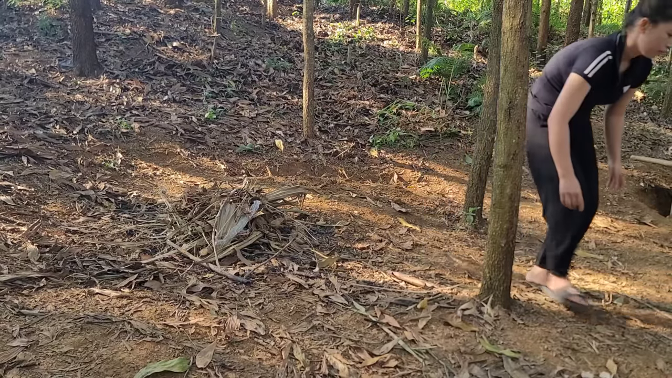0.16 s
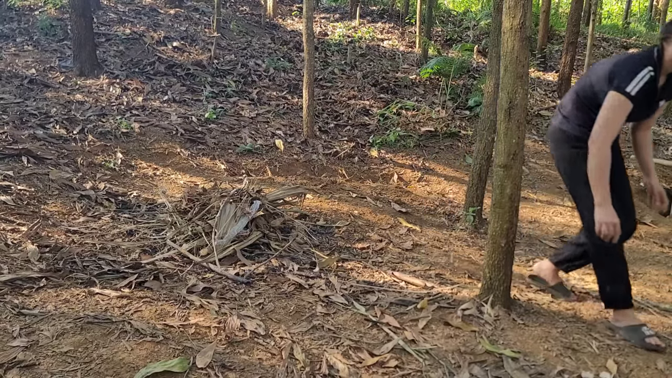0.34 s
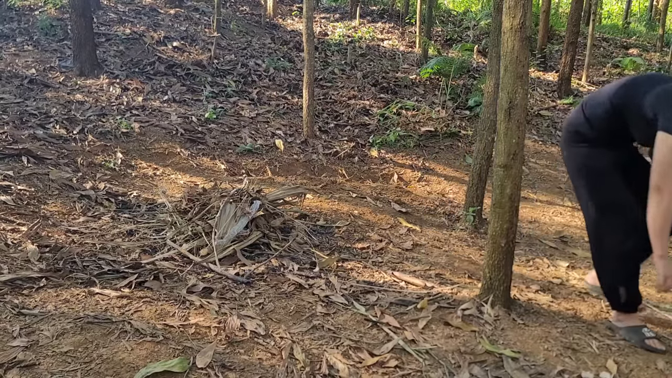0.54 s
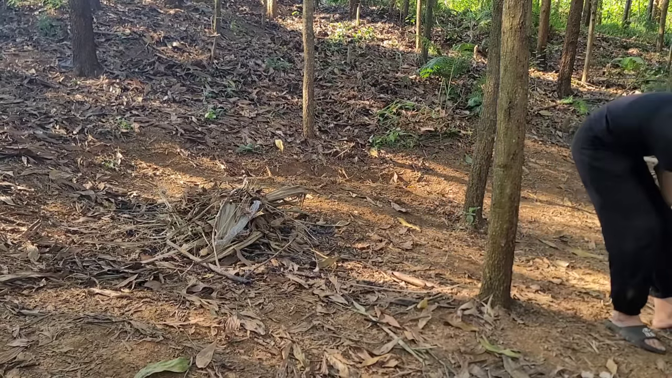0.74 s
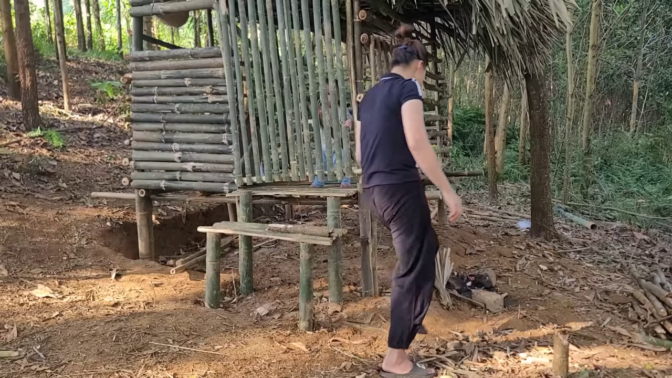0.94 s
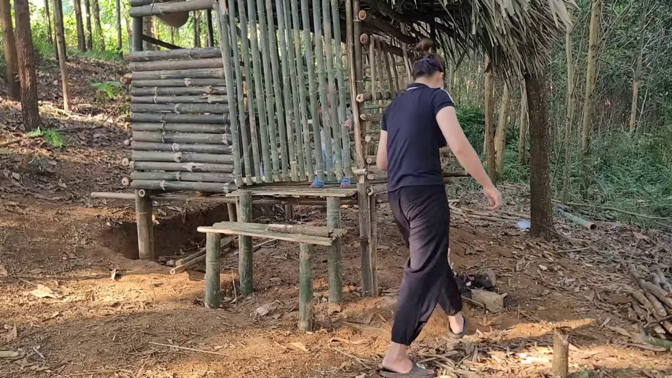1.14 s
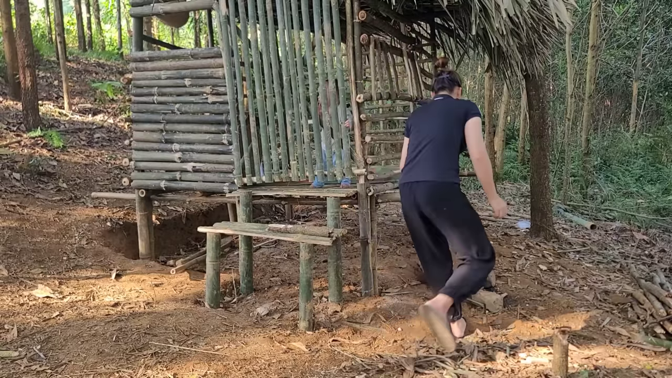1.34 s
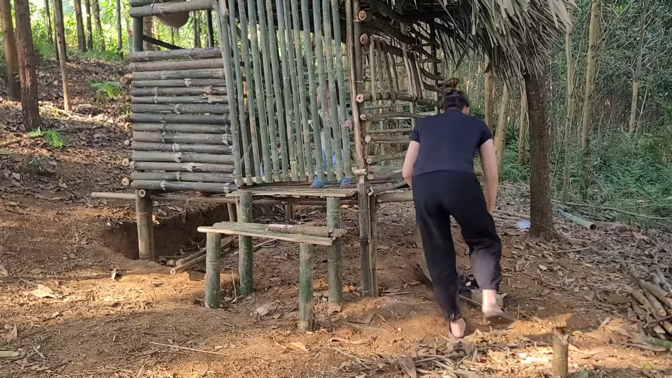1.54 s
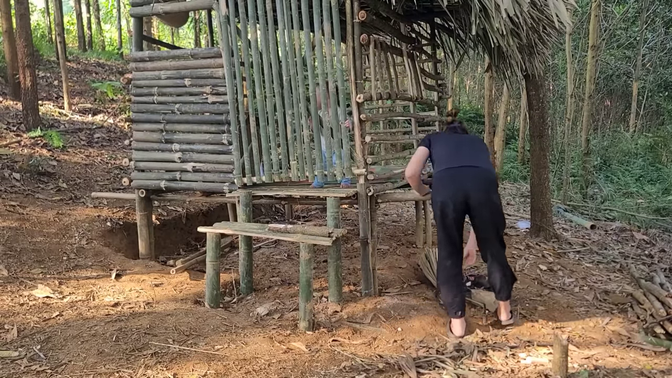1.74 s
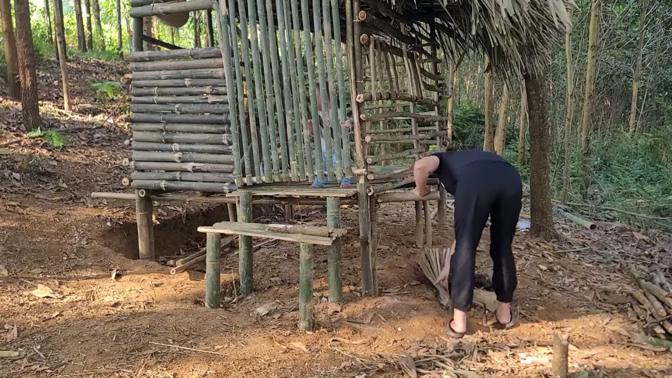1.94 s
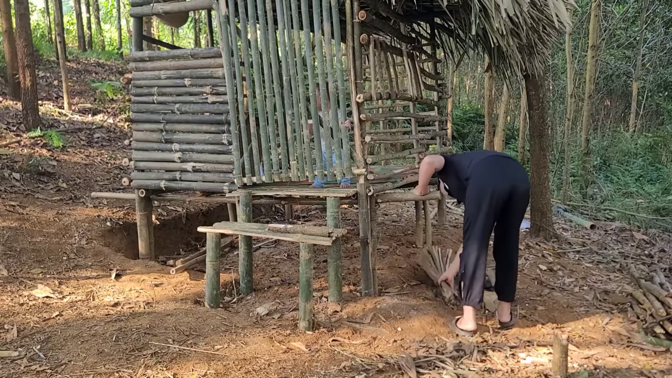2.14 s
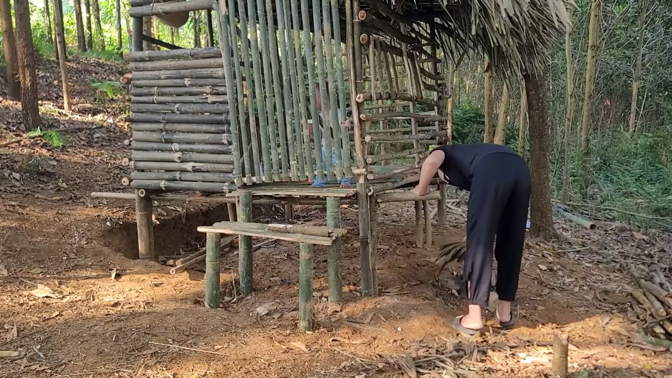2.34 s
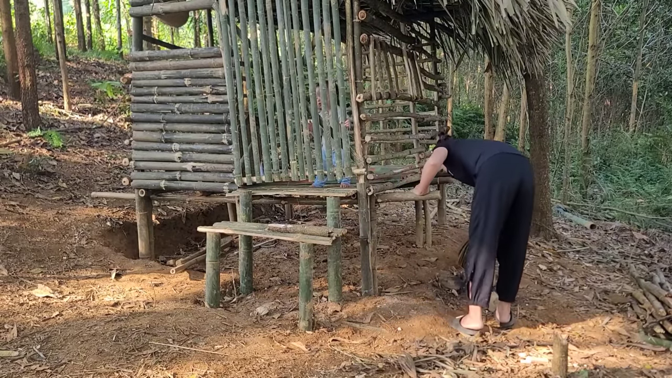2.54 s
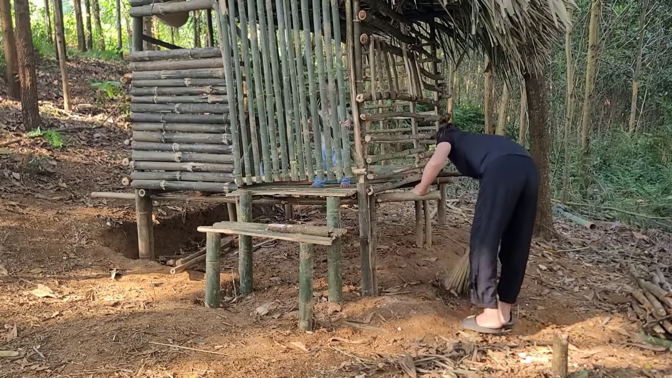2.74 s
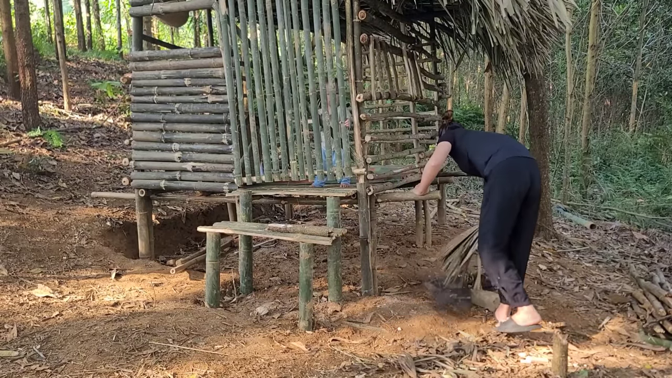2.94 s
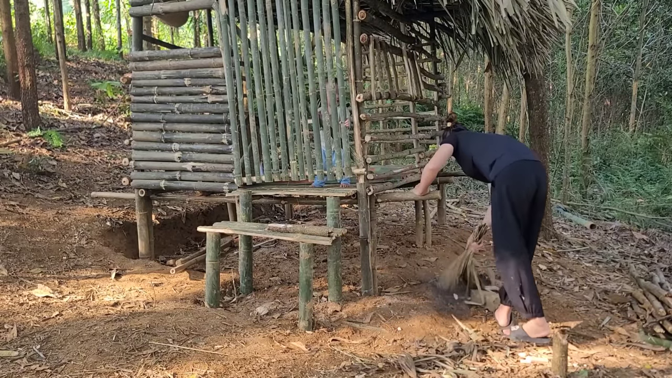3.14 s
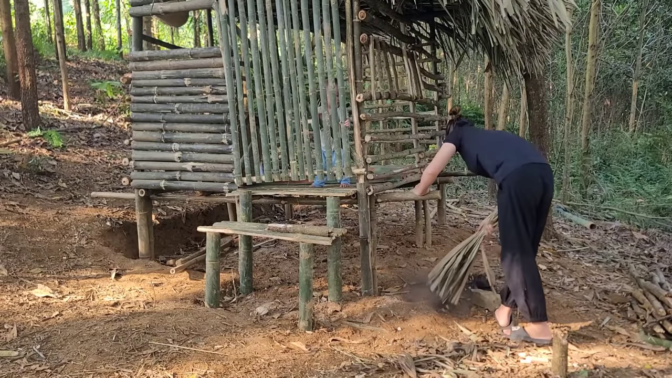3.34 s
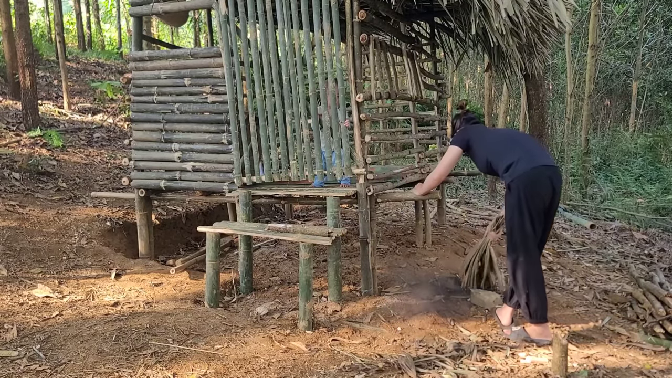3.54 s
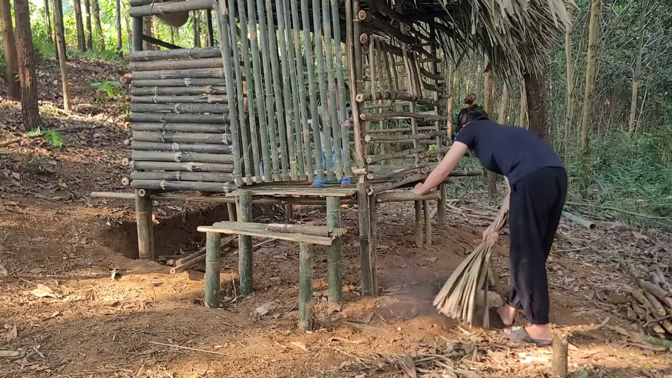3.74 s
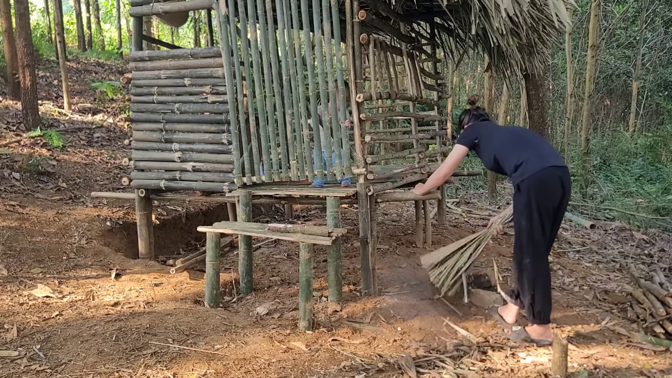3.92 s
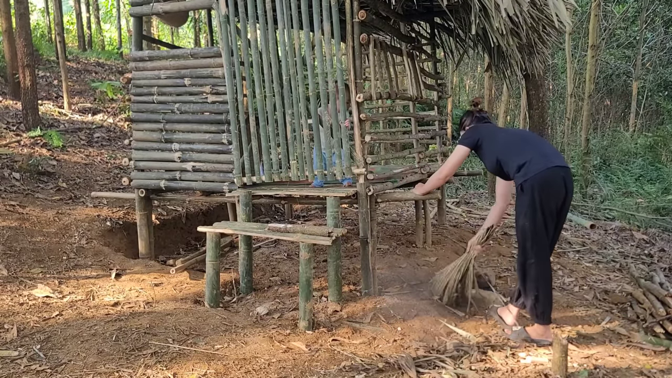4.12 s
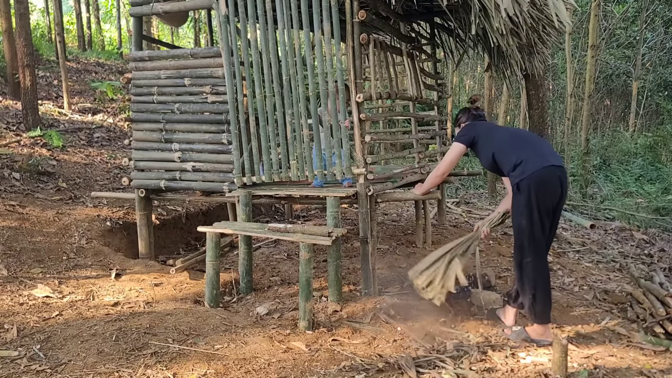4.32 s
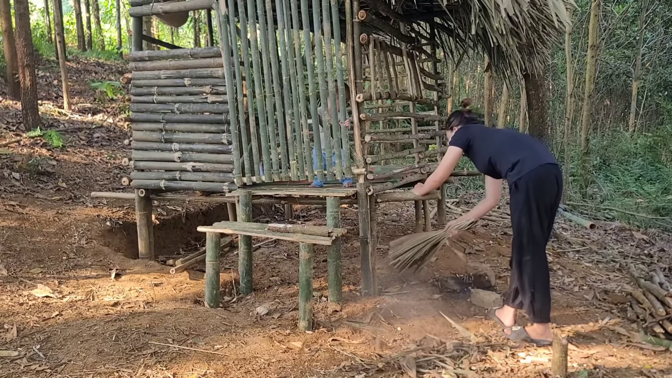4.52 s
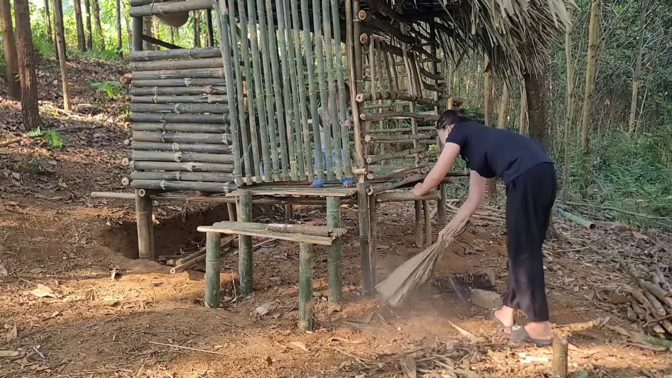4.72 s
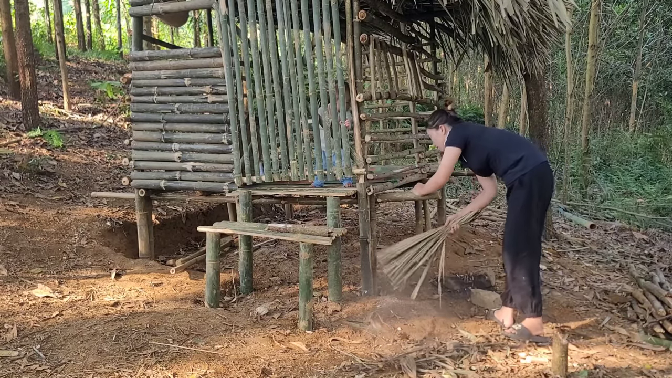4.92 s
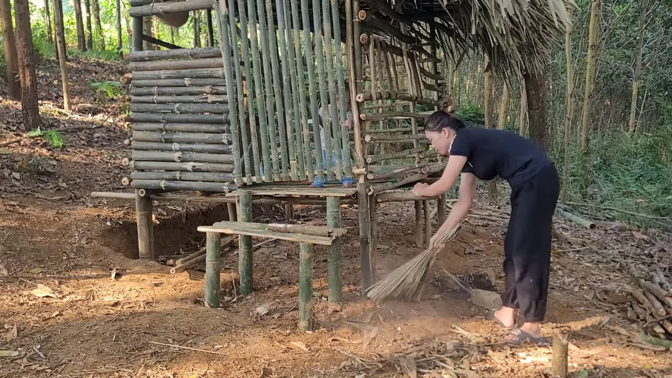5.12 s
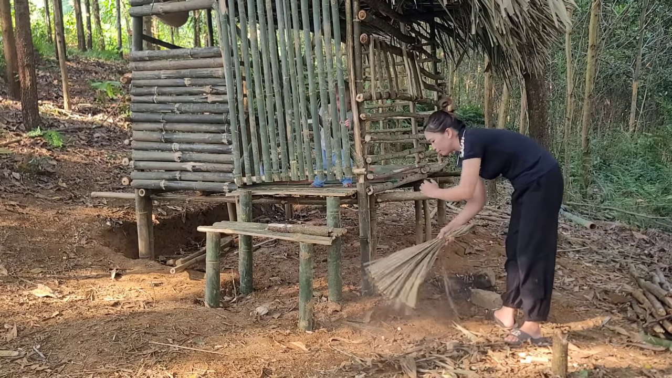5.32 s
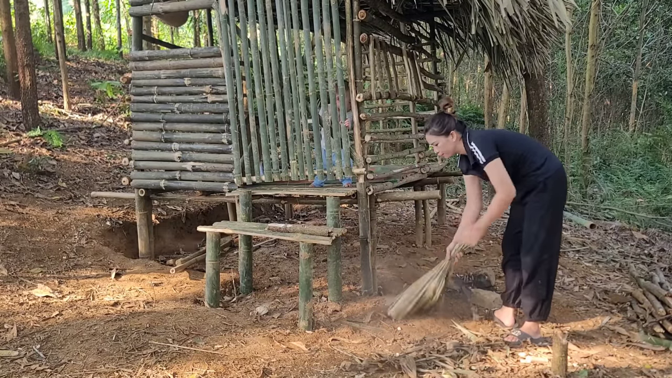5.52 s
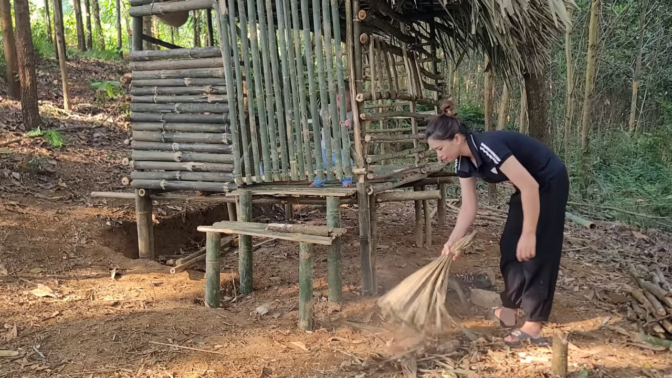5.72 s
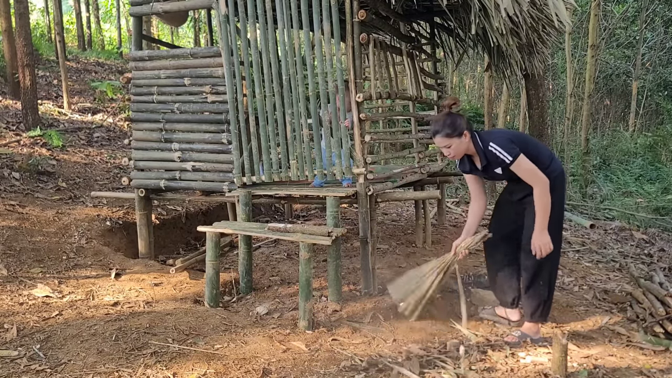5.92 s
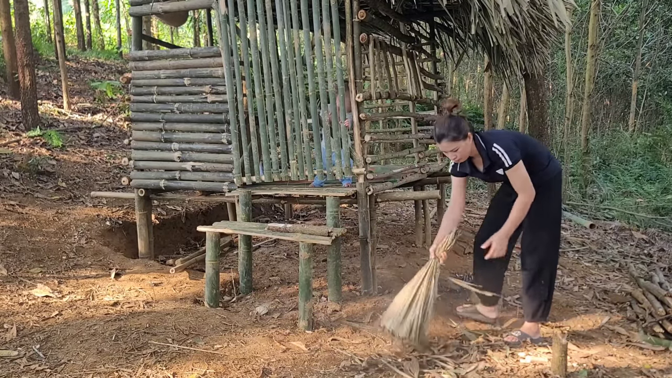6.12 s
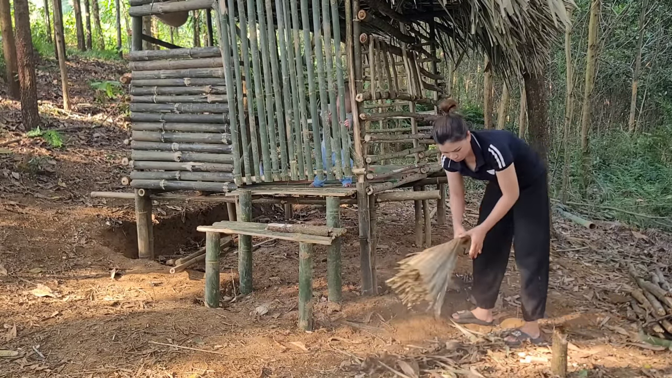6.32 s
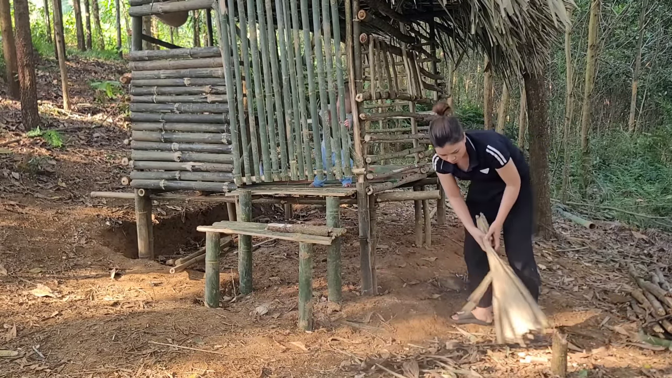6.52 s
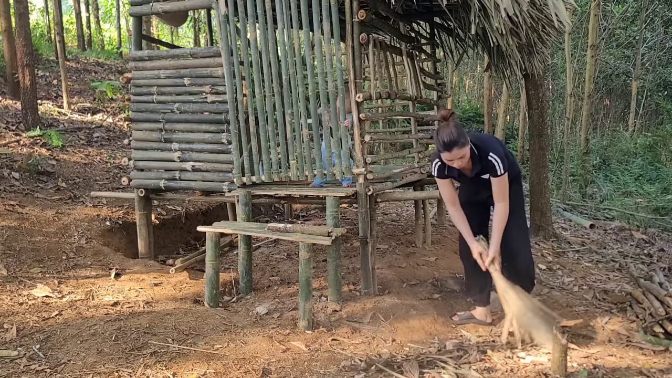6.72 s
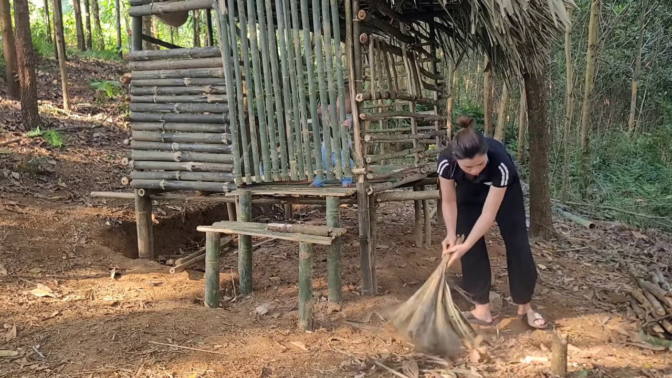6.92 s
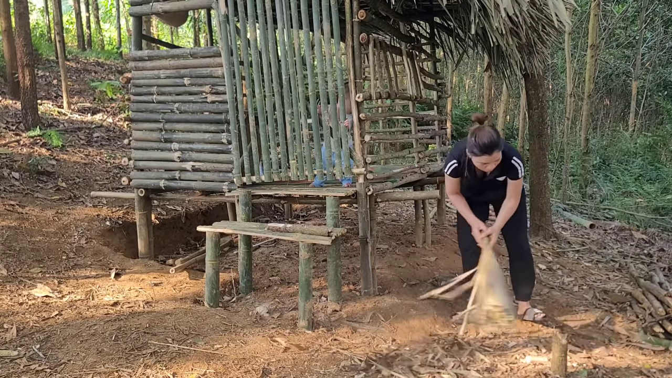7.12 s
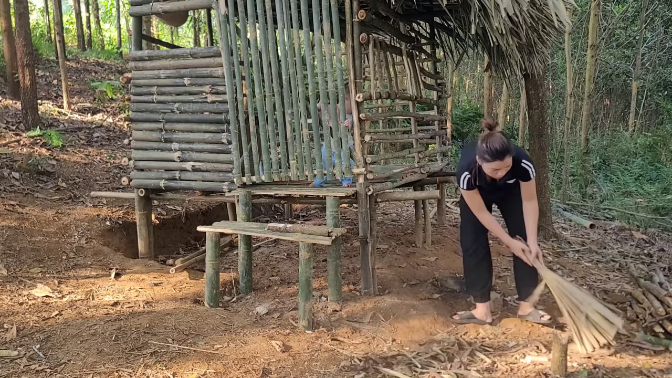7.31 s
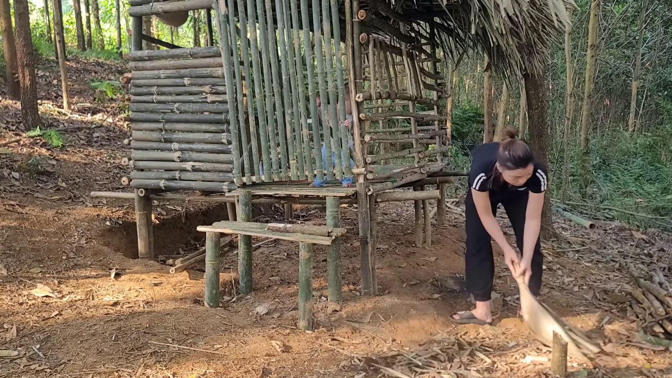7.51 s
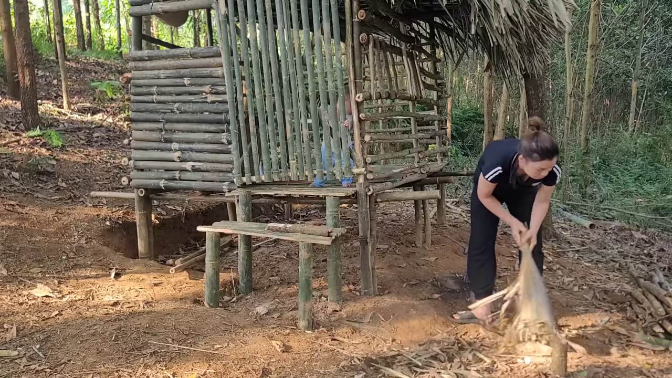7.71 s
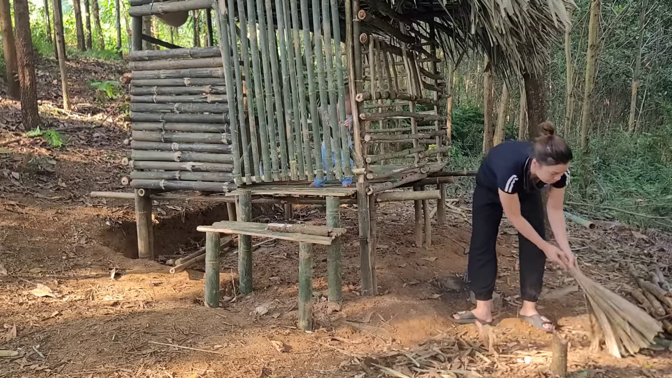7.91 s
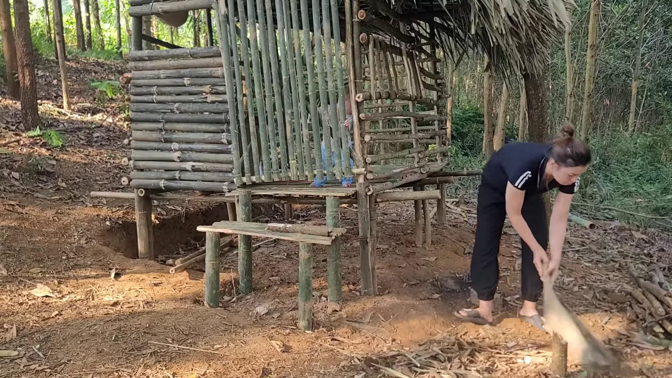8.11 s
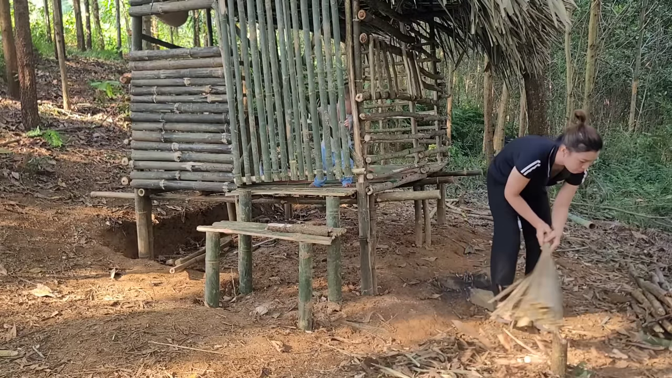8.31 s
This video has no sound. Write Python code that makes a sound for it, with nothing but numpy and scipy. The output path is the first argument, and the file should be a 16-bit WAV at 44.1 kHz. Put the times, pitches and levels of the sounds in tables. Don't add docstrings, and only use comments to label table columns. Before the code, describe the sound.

Faint insects, distant engine thuds and a bird whistle, a tiny silent gap, crackling leaf footsteps, then eleven scratchy strokes of a dry frond broom.

```python
import sys
import numpy as np
from scipy import signal
from scipy.fft import rfft, irfft
from scipy.io import wavfile
from scipy.ndimage import uniform_filter1d

SR = 44100
rng = np.random.default_rng(int(sys.argv[2]) if len(sys.argv) > 2 else 0)


def to_wav(sig):
    pcm = np.clip(np.atleast_2d(sig), -1, 1) * 32767
    pcm = np.round(pcm).astype(np.int16)
    wavfile.write(sys.argv[1], SR, pcm.T)


def volts_from_db(level):
    exponent = np.asarray(level, float) / 20
    return 10 ** exponent


N = 368676

CUT_START_S, CUT_END_S = .837, .862

# frequency in Hz, level in dB per Hz.
AIR_SPECTRA = [
    [(22, -30), (42, 3), (180, -3), (300, -10), (455, -19), (900, -17), (1900, -12), (5800, -25), (7000, -40), (8200, -62), (10600, -60), (11600, -29), (16000, -26)],
    [(18, -36), (40, -4), (165, -1.5), (300, -14.5), (820, -20.5), (1540, -25.5), (3400, -31.5), (5700, -23), (8200, -48), (9400, -58), (10800, -25), (16000, -18)],
]
AIR_LEVELS_DB = -71.5, -77
# pitch in Hz, width in Hz, throbs per second, throb depth 0-1, start and end in seconds.
CHOIRS = [
    (7270, 190, 24, .08, -1, 9),
    (7550, 800, 48, .1, -1, 9),
    (6800, 600, 12, .1, -1, 9),
    (8010, 130, 23.5, .6, .86, 9),
    (6450, 260, 23, .65, 2.12, 9),
    (4950, 260, 60, .12, 1.6, 1.82),
    (6500, 600, 23, .5, 3.28, 3.6),
    (7490, 110, 24, .05, -1, 9),
    (6780, 110, 24, .1, -1, .84),
]
CHOIR_LEVELS_DB = [-60, -69.5, -65, -65, -60.5, -73, -57, -64, -83]
# time in seconds, level in dB.
ENGINE_LEVEL = [
    (0.0, -53),
    (0.176, -45),
    (0.218, -52.5),
    (0.346, -46.5),
    (.6, -48.5),
    (0.84, -45.5),
]
# pitch in Hz, width in Hz, level in dB.
PIPE_MODES = [(55.9, 12, -1), (112, 16, -3.5), (140, 56, 1.5), (168, 14, -4), (255, 60, -22)]
# time in seconds, pitch in Hz, level in dB.
WHISTLE = [
    (.722, 1110, -70),
    (.742, 1115, -61),
    (.77, 1160, -65),
    (.795, 1215, -66),
    (.812, 1250, -74),
    (.835, 1290, -76),
    (.875, 1290, -95),
    (.895, 1325, -83),
    (.915, 1345, -81),
    (.94, 1330, -88),
]

# frequency in Hz, likeness 0-1.
NEAR_LIKENESS = [(60, .98), (500, .98), (1400, .9), (2800, .8), (4000, .6), (6200, .62), (8200, .36),
                 (10500, .5), (15000, .3)]
# frequency in Hz, likeness 0-1.
FAR_LIKENESS = [(200, .99), (600, .8), (1200, .3), (15000, .1)]
# time in seconds, lag in samples.
LEFT_LAG = [(.8, 14.7), (1, 5.6), (2, 5.2), (2.6, 5.23), (4.25, 5), (4.6, 3.8), (5.6, 4.27), (6.1, 4.23),
            (6.4, 4.5), (6.7, 7.7), (6.95, 4.94), (7.2, 5), (7.33, 9.7), (7.6, 6.84), (7.92, 8.9),
            (8.12, 9.4), (8.27, 6.5)]
# frequency in Hz, phase in radians.
HOUSING_LAG = [(325, -0.051), (1100, 0.24), (1550, -0.073), (2500, -0.44), (3800, -0.27), (7000, -1.1),
               (10500, -1.9), (13500, -0.62)]
# frequency in Hz, left minus right in dB.
PORT_TILT = [(300, 0), (1100, -0.7), (1550, -2), (2700, -1), (3800, 0.8), (4800, -5), (6000, -5.5),
             (9000, 1), (11000, -4.5), (14000, 3)]
# frequency in Hz, left minus right in dB per sample of lag.
SHADOW = [(600, 0), (1100, -0.4), (2050, -.5), (3100, -0.6), (4200, -0.5), (5800, 0.5), (9000, 0),
          (14000, 0)]
# frequency in Hz, level in dB per sample of lag.
DIRECTION_COLOUR = [(400, 0.41), (900, 0.68), (1500, 0.59), (2800, -0.16), (4200, -0.05), (6200, -0.6),
                    (9500, 0.57), (13000, 0)]
# time in seconds, level in dB.
FROND_SPREAD = [(2.3, -1), (2.75, 0), (3.2, -0.5), (3.66, -1.5), (4.2, -1.5), (4.7, 0), (5.15, 0),
                (5.6, 0.5), (6.05, -1.5), (6.7, 4), (6.95, 2.5), (7.35, 5), (7.55, 3), (7.8, 7), (7.95, 2),
                (8.12, 4), (8.3, 3.5)]
FROND_HZ, FROND_OCTAVES = 3040, 0.46
# delay in seconds, level in dB.
REFLECTIONS = [
    (.00147, -66),
    (.0043, -36),
    (.0091, -36),
    (.017, -14),
]

# time in seconds, peak in dB, pitch in Hz, grit over ring in dB.
FOOT_SNAPS = [(1.1084, -43, 5400, -22), (1.1638, -37.5, 1760, -23), (1.2401, -55, 1410, -18),
              (1.2695, -44.5, 2530, -7), (1.295, -39.5, 6030, 0), (1.3932, -55, 1740, -15),
              (1.4641, -48, 3970, -18), (1.7759, -49, 1700, -30), (2.0363, -57, 1740, -13),
              (2.0622, -50, 1100, -15), (2.1335, -34, 6400, -8), (2.3022, -42, 1660, -15.5),
              (2.3424, -42, 1750, -12), (2.3725, -42, 3270, -13), (2.4104, -41.5, 3380, -14),
              (2.4428, -51, 4900, -44), (2.4738, -60, 4760, -17)]
# time in seconds, peak in dB, pitch in Hz, grit over ring in dB.
BROOM_SNAPS = [(2.5643, -35, 5070, -14), (2.6953, -22, 1660, 5), (2.98, -23.5, 5160, -15),
               (3.091, -21, 5040, -14), (3.505, -29, 5450, -19), (3.5968, -13.5, 5500, -27),
               (3.7366, -21, 4830, -9), (3.9487, -31.5, 1150, -17), (4.0416, -24, 5200, -8),
               (4.0985, -24, 5560, -11), (4.597, -36, 1530, -16), (4.6101, -31, 2370, -13),
               (4.885, -33, 2350, -9), (4.9473, -35, 2820, -20), (5.0043, -30, 920, -18),
               (5.316, -15.5, 5970, -4), (5.728, -24, 2180, -20), (5.908, -35, 1400, -8),
               (5.9913, -21, 1520, -1), (6.3554, -41, 2260, -16), (6.4734, -38, 2170, -16),
               (6.6, -24, 5200, -41), (6.659, -26, 4370, -25), (7.1863, -49, 2370, -18),
               (7.27, -31, 4080, -20), (7.2873, -40, 3730, -17), (7.831, -37, 4240, -8),
               (7.9238, -18.5, 4080, -18), (7.985, -22, 3740, -20), (8.0144, -17, 3640, -32)]
# time in seconds, peak in dB, pitch in Hz, grit over ring in dB.
CRACKS = [(1.166, -37, 540, -30), (.3788, -44, 6040, -30), (3.415, -38, 6340, -12), (0.379, -38, 3800, -40),
          (.685, -52, 2450, -27), (1.825, -47, 5500, -20), (2.082, -46, 1100, -32), (2.108, -50, 1050, -30),
          (2.134, -33, 10800, -17.5), (2.375, -42, 3210, -30), (3.453, -42, 9200, -15),
          (3.494, -41, 8500, -15), (7.2475, -36, 2000, -6), (1.164, -39.5, 1040, -20),
          (1.3932, -54, 1800, -33), (1.776, -45, 330, -40), (1.782, -43, 1690, -34),
          (2.045, -50, 1900, -20), (2.075, -46, 2300, -20), (2.303, -41, 1740, -32),
          (2.345, -47, 1740, -25), (4.5983, -20.5, 6400, -10), (7.033, -18.5, 3020, -12),
          (2.5836, -33, 6400, -12), (2.788, -24, 3670, -14), (3.07, -35, 1760, -12), (4.882, -37, 5850, -8),
          (4.91, -25, 1520, -20), (5.0401, -35, 4740, -14), (5.4904, -23, 2250, -14),
          (5.646, -21, 3340, -12), (5.9355, -36, 5250, -8), (5.9465, -31, 1480, -14),
          (5.9744, -22, 2420, -14), (7.27, -29, 4600, -14), (7.8827, -33, 4910, -16),
          (7.8875, -25, 1380, -28), (7.939, -26, 2230, -18), (7.961, -32, 4400, -14),
          (7.9842, -15, 3880, -16), (8.062, -23, 4500, -18)]
SNAP_T60_S, CRACK_T60_S = 0.041, 0.027

# touch, rise and hold in seconds, lift in dB per second, straw level in dB.
FEET = [(.861, .003, 0.053, 120, -83), (-.1, 0.042, 0.11, 60, -79), (.2, 0.089, .06, 80, -72.5),
        (.6, 0.083, 0.1, 1494, -76.5), (1.03, 0.015, 0.017, 289, -86), (1.86, 0.033, 0.042, 197, -91),
        (1.09, 0.022, 0.022, 298, -68), (1.15, 0.016, 0.0043, 596, -64), (1.22, 0.029, 0.038, 200, -74),
        (1.385, .01, .005, 900, -84), (1.765, 0.0043, 0.013, 700, -73.5), (1.96, 0.085, 0.03, 91, -68.5),
        (2.28, 0.02, 0.0062, 173, -65), (2.4, 0.038, .04, 148, -74.5)]
# touch, rise and hold in seconds, lift in dB per second, straw level in dB.
STROKES = [(2.57, 0.12, 0.13, 55, -42), (3.06, 0.11, 0.14, 154, -38), (3.596, 0.061, 0.043, 130, -32.5),
           (4.05, 0.078, 0.13, 112, -33.5), (4.6, 0.036, 0.12, 96, -34), (5.03, 0.084, 0.087, 95, -32.5),
           (5.47, 0.051, 0.12, 86, -33), (5.945, 0.076, 0.092, 151, -31.5), (6.72, 0.047, 0.24, 108, -39.5),
           (7.285, 0.2, 0.17, 102, -38), (7.882, 0.18, 0.1, 70, -36)]
# touch, rise and hold in seconds, lift in dB per second,
# straw level in dB.
BRUSHES = [(2.95, 0.021, 0.15, 98, -51.5), (3.38, 0.014, 0.28, 199, -57), (3.54, 0.045, 0.031, 202, -48.5),
           (3.84, 0.028, 0.18, 78, -52), (4.36, 0.073, 0.073, 26.5, -51), (4.54, 0.013, 0.019, 300, -54),
           (4.88, 0.016, 0.1, 100, -48), (5.29, 0.018, 0.0058, 200, -40.5), (5.39, 0.025, 0.048, 103, -44),
           (6.2, 0.015, 0.014, 281, -42.5), (6.32, 0.035, 0.062, 143, -53.5),
           (6.524, 0.0046, 0.57, 104, -47), (6.83, 0.0082, 0.15, 145, -33), (7.17, 0.016, 0.11, 300, -55.5),
           (7.284, 0.0033, 0.0054, 300, -42.5), (7.32, .02, 0.056, 60, -51),
           (7.74, 0.018, 0.0087, 302, -55), (7.88, 0.0052, 0.023, 58, -57), (8.2, 0.02, 0.045, 168, -42.5)]
# touch, rise and hold in seconds, lift in dB per
# second, straw level in dB.
DIGS = [(1.85, 0.018, 0.059, 400, -87), (2.77, 0.017, 0.012, 150, -42), (3.08, 0.015, 0.016, 150, -43.5),
        (3.2, 0.0064, 0.034, 207, -39), (3.592, 0.016, 0.034, 145, -41.5), (3.82, 0.0046, 0.024, 210, -53),
        (4.19, 0.02, 0.014, 180, -38), (4.8, 0.0087, 0.028, 204, -58), (5.0, 0.003, 0.019, 302, -49),
        (5.93, 0.012, .02, 214, -50), (6.2, 0.011, 0.023, 146, -63), (7.49, 0.0043, 0.018, 200, -47),
        (7.875, 0.0071, 0.034, 300, -49.5)]
# level over straw in dB, dulling in dB per second,
# share of lift speed, share of litter.
STROKE_PARTS = [(-5.5, -10.5, 1.17, 0.68), (-1, -9.5, 0.89, 0.15), (1, -5.5, 0.85, 0.85),
                (-1, -8.5, 0.97, 0.91)]
BRUSH_PARTS = [(-12.5, -20, 0.64, 0.089), (-4.5, 6.5, 2, 0.26), (-2.5, -3, 1.65, 1.8), (-4, -3, 2.7, 1.2)]
DIG_PARTS = [(-1, -42, 1.5, 0.76), (1, -3, 0.41, 0.13), (3.5, -17, 1.4, 0.88), (1.5, -19, 3.3, 1)]
FEET_PARTS = [(-6, -37, 1.1, -0.18), (1.5, 18, 1.1, 0.19), (8, 9, 0.65, 0.34), (4.5, 14, 0.69, 0.64)]
PRESSURE_NEED = [1.35, 1.33, 0.99, 1.08]
# level in dB for earth, straw, leaf, dust.
SETTLE_LEVELS_DB = [-42, -25, -21.5, -24.5]
SETTLE_DB_PER_S = 13
TOUCH_DB, TOUCH_S = -13, 0.0037
# time in seconds, level in dB.
LITTER = [(.1, -27), (.3, -14), (.5, -35), (.83, -38), (.87, -3), (2.1, -4), (2.4, 4.5), (2.75, 7.5),
          (3.2, 1.5), (3.5, 4), (3.7, 1.5), (4.2, 1.5), (4.7, -1), (5.6, -0.5), (6.1, -1), (6.9, 0),
          (7.5, 1), (8.2, 1)]
# time in seconds, level in dB.
WEIGHT = [(2.4, 5.5), (2.75, 2.5), (2.97, -0.5), (3.2, 1), (3.65, -1), (4.2, 0), (4.7, 1.5), (5.2, 2),
          (5.6, 1.5), (6.05, 2), (6.4, 2), (6.7, 3), (6.95, 0.5), (7.12, 0), (7.35, 3), (7.55, 2.5),
          (7.95, -0.5), (8.2, 3)]
WEIGHT_SHARE = [0.78, 0.75, 0.17, 0]
# time in seconds, level over the stroke in dB.
SLIPS = [(2.7322, 2), (2.7399, 6), (2.8028, 2), (2.9839, 9), (3.1922, 11), (3.2625, 5.5), (3.2697, 2),
         (3.676, 1), (3.7067, 1), (4.156, 5), (4.2125, 2.3), (4.2604, -4), (4.5374, 8), (4.6366, -1),
         (4.6464, 0), (4.7356, -1), (4.7457, -2), (4.8209, 1), (4.8956, 11), (4.946, 9), (5.1155, 2.6),
         (5.1772, 1), (5.186, 6), (5.204, 2.2), (5.244, 3.5), (5.3233, 5), (5.516, -6), (5.542, -4),
         (5.6003, 5), (5.6071, 2.3), (5.8226, -1), (5.9087, 5), (6.1012, 0), (6.1536, 2.4), (6.2263, 1),
         (6.3548, 7), (6.4741, 9), (6.7594, 3.1), (6.7914, -2), (6.8497, 3), (6.962, 1.5), (7.187, 6),
         (7.2948, 10.5), (7.3295, 3.1), (7.3906, 3.1), (7.4406, 4), (7.494, 3.0), (7.5163, 5), (7.534, 2),
         (7.5543, 0), (7.645, 0), (7.831, 3), (7.8866, 5), (7.893, 5), (7.9005, 0), (8.0297, 5), (8.117, 7),
         (8.1258, 2.7), (8.1605, -4), (8.2593, 0.5)]
# frequency in Hz, level in dB per Hz.
SCRATCH_SPECTRUM = [(30, -62), (60, -12), (170, 5.5), (440, -1.5), (700, 3.5), (1200, -9), (1600, -4.5),
                    (2300, -5), (4000, -4.5), (5600, -4), (7150, -6), (7750, -10), (8700, -7.5),
                    (10500, -6), (13000, -8.5), (16000, -10)]
PART_BANDS = [(200, 900), (1100, 3000), (3200, 7000), (8200, 15500)]
STEP = 44


def evened(x):
    return x / np.sqrt(np.mean(x ** 2) + 1e-20)


def read(points, hz):
    f, value = np.transpose(points)
    return np.interp(np.log(hz + 1), np.log(f + 1), value)


def curve(rows):
    s, *columns = np.transpose(rows)
    return [np.interp(np.arange(N) / SR, s, c) for c in columns]


def between(start_s, end_s, fade_s=0.0018):
    t = np.arange(N) / SR
    return np.clip(np.minimum(t - start_s, end_s - t) / fade_s + .5, 0, 1)


def drift(hz):
    lowpass = signal.butter(2, hz, fs=SR, output="sos")
    return evened(signal.sosfilt(lowpass, rng.standard_normal(N)))


def resonate(x, hz, width_hz):
    turn = np.exp(2j * np.pi * np.cumsum(hz * np.ones(x.shape[-1])) / SR)
    r = np.exp(-np.pi * width_hz / SR)
    return 2 * (turn * signal.lfilter([1 - r], [1, -r], x / turn)).real


def echoed(x):
    taps = np.zeros(1500)
    taps[0] = 1
    for delay_s, db in REFLECTIONS:
        taps[round(delay_s * SR)] = volts_from_db(db)
    return signal.oaconvolve(x, [taps])[:, :N]


def ports(direct, scattered, likeness=NEAR_LIKENESS, patchy_db=0, size=256, fronds=0):
    hz, t, z = signal.stft(np.array([direct, scattered]), SR, nperseg=size)
    patches = uniform_filter1d(rng.standard_normal(z[0].shape), 2, 0)
    patches = uniform_filter1d(patches, 12, 1)
    lag_samples = np.interp(t, *np.transpose(LEFT_LAG))
    off_centre = lag_samples - 4.5
    lag_rad = 2 * np.pi * hz[:, None] * lag_samples / SR + read(HOUSING_LAG, hz)[:, None]

    ring = np.exp(-.5 * (np.log2((hz + 1) / FROND_HZ) / FROND_OCTAVES) ** 2)
    colour_db = read(DIRECTION_COLOUR, hz)[:, None] * off_centre + patchy_db * evened(patches)
    colour_db = colour_db + fronds * np.outer(ring, np.interp(t, *np.transpose(FROND_SPREAD)))

    same = read(likeness, hz)[:, None]
    both = np.sqrt((1 + same) / 2) * z[0]
    apart = np.sqrt((1 - same) / 2) * z[1]
    side_db = read(PORT_TILT, hz)[:, None] + read(SHADOW, hz)[:, None] * off_centre
    left = volts_from_db(side_db / 2) * np.exp(-.5j * lag_rad)
    pair = np.array([(both + apart) * left, (both - apart) / left]) * volts_from_db(colour_db)
    return signal.istft(pair, SR, nperseg=size)[1][:, :N]


def air():
    hz, out = np.fft.rfftfreq(N, 1 / SR), 0
    gates = [between(-1, CUT_START_S), between(CUT_START_S, 9)]
    for spectrum, db, gate in zip(AIR_SPECTRA, AIR_LEVELS_DB, gates):
        noise = ports(*rng.standard_normal((2, N)), FAR_LIKENESS, 0.69)
        z = rfft(noise) * volts_from_db(read(spectrum, hz))
        core = irfft(z.mean(0) * (hz > 400) * (hz < 5500), N)
        out = out + volts_from_db(db + 1.2 * drift(5)) * gate * irfft(z, N) / np.std(core)
    return out


def insects():
    out = 0
    for (hz, width_hz, throbs_per_s, depth, start_s, end_s), db in zip(CHOIRS, CHOIR_LEVELS_DB):
        phase = 2 * np.pi * np.cumsum(throbs_per_s * (1 + .13 * drift(6))) / SR
        throb = 1 + depth * np.sin(phase)
        song = rng.standard_normal((2, N))
        for _ in range(3):
            song = resonate(song, hz, 1.25 * width_hz)
        song = song / uniform_filter1d(evened(song) ** 2 + .05, 60) ** .15
        level = volts_from_db(db + 1.2 * drift(2)) * between(start_s, end_s, .03)
        out = out + level * evened(song * throb ** 2)
    out = signal.sosfilt(signal.butter(12, 8150., fs=SR, output="sos"), out)
    return out * volts_from_db([[-1.1], [1.1]])


def engine():
    firings_per_s, uneven_db, strong_weak_db, rough = 27.95, 1.1, 2.4, .03
    lead = SR // 4
    count = np.floor((np.arange(N) - lead) * firings_per_s / SR + .067)
    fire = np.diff(count, prepend=count[0])
    fire_db = uneven_db * rng.standard_normal(N) + strong_weak_db * (-1) ** count
    drive = evened(fire * volts_from_db(fire_db)) + rough * rng.standard_normal(N)
    modes = []
    for hz, width_hz, db in PIPE_MODES:
        ring = resonate(resonate(drive, hz, width_hz), hz, 2 * width_hz)
        modes.append(volts_from_db(db) * evened(ring))
    pipe = sum(modes[1:-1]) - modes[0]
    distance = signal.butter(5, [27, 184], "band", fs=SR, output="sos")
    pipe = signal.sosfiltfilt(distance, pipe) + modes[-1]
    return volts_from_db(curve(ENGINE_LEVEL)[0]) * np.roll(evened(pipe), -lead) * between(-1, CUT_START_S)


def bird():
    hz, db = curve(WHISTLE)
    tone = np.sqrt(2) * np.sin(2 * np.pi * np.cumsum(hz) / SR) * (1 + 0.37 * drift(50))
    return volts_from_db(db) * tone * between(WHISTLE[0][0], WHISTLE[-1][0], 0.013)


def snaps():
    out, t = np.zeros((2, N + 3000)), np.arange(3000) / SR
    for rows, t60_s in [(FOOT_SNAPS, SNAP_T60_S), (BROOM_SNAPS, SNAP_T60_S), (CRACKS, CRACK_T60_S)]:
        for s, db, hz, grit_db in rows:
            noise = rng.standard_normal((2, 3000))
            ring = .75 * np.sin(2 * np.pi * hz * t) * volts_from_db(-60 * t / (.35 * t60_s))
            body = .55 * evened(resonate(resonate(noise, hz, .7 * hz), hz, .7 * hz))
            grit = volts_from_db(grit_db) * evened(np.diff(noise, 2, prepend=[[0, 0]] * 2))
            snap = ring * [[1], [-.4]] + (body + grit) * volts_from_db(-60 * t / t60_s)
            snap = volts_from_db(db - 4) * np.minimum(t / .0004, 1) * snap
            out[:, round(s * SR):][:, :3000] += snap
    return ports(*echoed(out[:, :N]))


def contact(rows, parts, settle_db):
    t = np.arange(0, N, STEP) / SR
    start, rise, hold, lift, level_db = np.transpose(rows)[:, :, None]
    u = t - start
    litter_db = np.interp(t, *np.transpose(LITTER))
    press = np.clip(u / rise, 0, 1)
    after = np.maximum(u - rise - hold, 0)
    on = np.clip(u / TOUCH_S, 0, 1) ** 2
    out = []
    for (over_db, dulling, speed, share), rest_db, need in zip(parts, settle_db, PRESSURE_NEED):
        db = level_db + need * TOUCH_DB * (1 - press) + over_db
        stroke = volts_from_db(db + dulling * np.clip(u, 0, .4) - speed * lift * after) ** 2
        settling = volts_from_db(db - over_db + rest_db - SETTLE_DB_PER_S * after) ** 2
        out.append((on * (stroke + settling)).sum(0) * volts_from_db(share * litter_db) ** 2)
    return np.array(out)


def pressure():
    power = contact(STROKES, STROKE_PARTS, SETTLE_LEVELS_DB)
    for rows, parts in [(BRUSHES, BRUSH_PARTS), (DIGS, DIG_PARTS), (FEET, FEET_PARTS)]:
        power = power + contact(rows, parts, [-60] * 4)
    power = power * volts_from_db(np.outer(WEIGHT_SHARE, curve(WEIGHT)[0][::STEP])) ** 2
    return [np.interp(np.arange(N), np.arange(len(p)) * STEP, np.sqrt(p)) for p in power]


def slipping():
    rise_s, fall_s = .0006, .0045
    s, db = np.transpose(SLIPS)
    kicks, t = np.zeros(N), np.arange(1500) / SR
    kicks[np.round(s * SR).astype(int)] = 0.69 * (volts_from_db(db) - 1)
    shape = np.minimum(t / rise_s, 1) * np.exp(-t / fall_s)
    return 1 + signal.oaconvolve(kicks, shape)[:N]


def scratching():
    grains_per_s, spread_db, cycles = 5000, 2.8, 5
    slips_per_s, slip_gain, slip_s, clump_db = 110, .45, .005, .3
    slips = (rng.random(N) < slips_per_s / SR) * rng.random(N)
    slips = signal.lfilter([1], [1, -np.exp(-1 / (slip_s * SR))], slips)
    clumps = volts_from_db(clump_db * drift(17.0)) * (1 + slip_gain * slips)
    size = volts_from_db(spread_db * np.minimum(rng.exponential(1, (2, N)), 4.2))
    size = size * (rng.random((2, N)) < grains_per_s / SR)
    kind, grains = rng.integers(0, 24, (2, N)), 0
    for k, hz in enumerate(np.geomspace(300, 14000, 24)):
        turns = np.arange(800) * hz / SR
        grain = np.sin(2 * np.pi * turns) * turns * np.exp(-3 * turns / cycles)
        grain = grain / np.linalg.norm(grain) * hz ** 0.43
        grains += signal.oaconvolve(size * (kind == k), [grain])[:, :N]
    hiss = rng.standard_normal((2, N))
    return clumps * slipping() * np.sqrt(.5) * (evened(grains) + hiss)


def sweeping():
    hz = np.fft.rfftfreq(N, 1 / SR)
    heard = ports(*echoed(scratching()), patchy_db=1.77, size=512, fronds=1.0)
    z = rfft(heard) * volts_from_db(read(SCRATCH_SPECTRUM, hz))
    log_edges, out = np.log(np.ravel(PART_BANDS)), 0
    for k, gain in enumerate(pressure()):
        low_hz, high_hz = PART_BANDS[k]
        band = np.interp(np.log(hz + 1), log_edges, np.repeat(np.arange(4) == k, 2))
        core = irfft(z.mean(0) * (hz > low_hz) * (hz < high_hz), N)
        out = out + gain * irfft(z * band, N) / np.std(core)
    return out


def scene():
    return air() + insects() + engine() + bird() + snaps() + sweeping()


def top_cut(x):
    return signal.sosfilt(signal.butter(12, 16810, fs=SR, output="sos"), x)


def record(dry):
    limit = signal.firwin(1023, 15940, window=("kaiser", 10), fs=SR)
    muted = dry * (1 - between(CUT_START_S, CUT_END_S, .0003))
    mix = signal.oaconvolve(muted, [limit], "same")
    return top_cut(mix)


dry = scene()
out = record(dry)
to_wav(out)
```